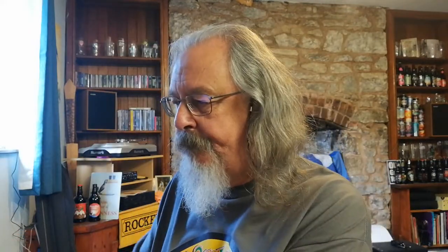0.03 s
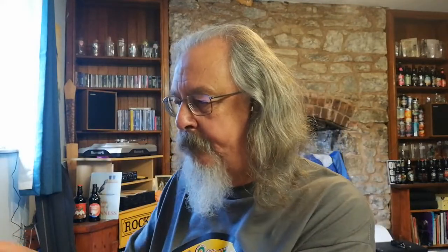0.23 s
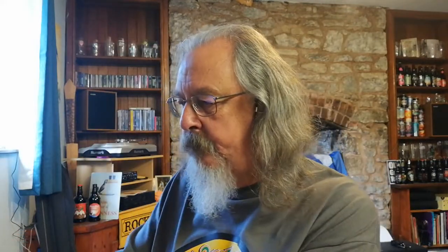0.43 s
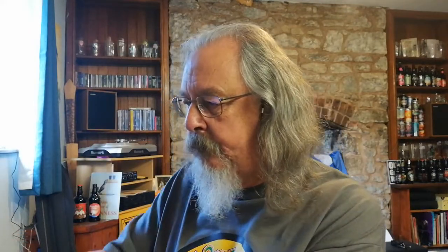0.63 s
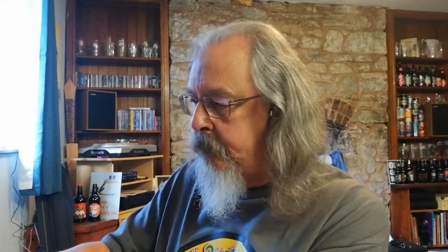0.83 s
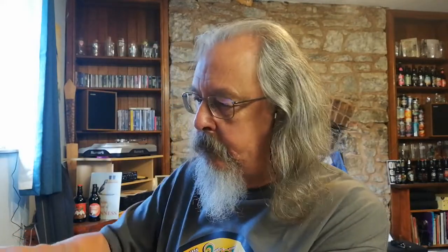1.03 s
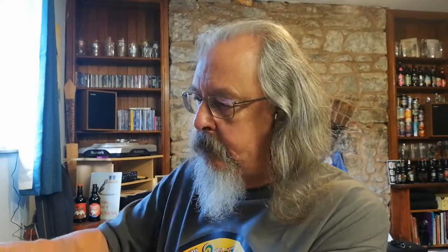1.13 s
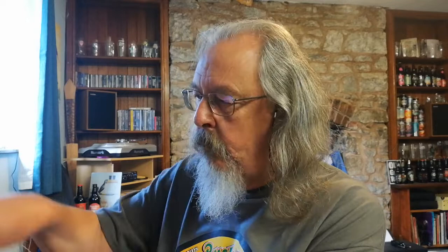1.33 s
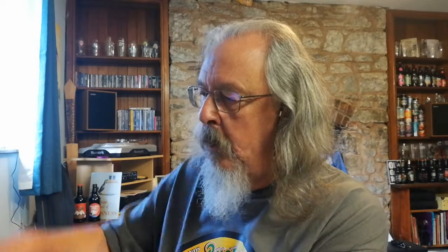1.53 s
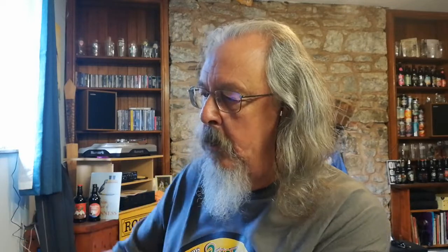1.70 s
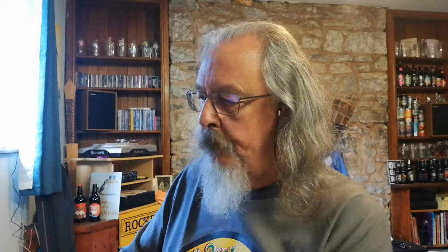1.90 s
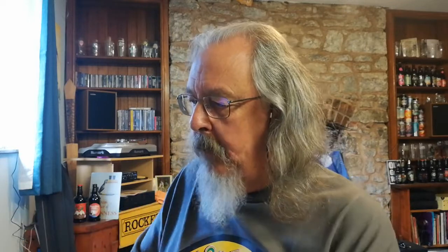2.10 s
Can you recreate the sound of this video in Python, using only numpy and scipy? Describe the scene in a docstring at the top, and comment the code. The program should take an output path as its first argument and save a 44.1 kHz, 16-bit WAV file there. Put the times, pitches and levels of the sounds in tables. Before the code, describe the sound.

A glass bottle is opened close by, slightly left, in a quiet room. Something slides softly over wood, then a metal opener clinks on the cap at 0.5 and 0.6 seconds. Gas hisses briefly just after 1 second. The cap snaps off at 1.3 seconds and rattles. Metal lands with a bright ring at 1.7 seconds, followed by dull bumps on a wooden table around 2 seconds.

```python
"""Something slides softly over a wooden table, then a steel opener clinks onto a beer bottle's crown cap.
Gas hisses through the gap as the cap lifts; the cap snaps off and rattles against the opener. The metal
lands with a bright, beating ring and things bump on the table, close by and a little left in a living room.
Rubs and hiss are shaped noise, knocks are short noise bursts; steel, glass and wood ring in fading modes."""
import sys
import numpy as np
from scipy import signal
from scipy.fft import rfft, irfft
from scipy.io import wavfile

SR = 44100
rng = np.random.default_rng(int(sys.argv[2]) if len(sys.argv) > 2 else 0)


def write(x):
    x = np.atleast_2d(x).T
    wavfile.write(sys.argv[1], SR, np.round(np.clip(x, -1, 1) * 32767).astype(np.int16))


N = 95167
TIME = np.arange(N) / SR

# Stereo image of the noises. Each row: frequency in Hz, left-right correlation.
STEREO_LIKENESS = [(110, 1), (300, 0.74), (600, 0.025), (12000, 0.26)]
# Tone colours of the noises. Each row: frequency in Hz, relative level in dB.
ROOM_TONE_COLOUR = [(50, 3), (110, -12), (500, -16), (1200, -13.5), (7000, -23.5), (10300, -21),
                    (16000, -36.5)]
RUB_COLOUR = [(300, -16.5), (1400, -5.5), (3000, -6.5), (3800, -1.5), (5000, -8.5), (8000, -8),
              (10300, 3.5), (11300, -4), (13000, -20), (16000, -22)]
WOOD_COLOUR = [(30, -5.5), (70, -5.5), (130, -1), (220, -15.5), (2000, -43)]
HISS_COLOUR = [(600, -41.5), (1800, -27), (4500, -15.5), (7500, -10.5), (9400, 2.5), (11500, -0.5),
               (16000, -15.5)]
# One fader curve for each rub across the table. Each point: time in seconds, level in dB.
RUB_FADES = [
    [(0, -45), (.13, -48), (.2, -43.5), (.29, -46.5), (.36, -55.5), (.45, -76)],
    [(1.88, -63), (2.0, -54.5), (2.16, -72)],
]
# The table rumbling under moving hands. Each row: time in seconds, level in dB.
RUMBLE_FADE = [(0, -62), (.21, -48), (.32, -51.5), (.39, -66), (.8, -69), (1.29, -66), (1.36, -45),
               (1.46, -44), (1.6, -48.5), (1.8, -86)]

# The frequencies in Hz at which the knocks are voiced.
KNOCK_BANDS_HZ = [110, 380, 1300, 3500, 10000]
# Knock cues. Each row: start in seconds, then a relative level in dB for each of those frequencies.
KNOCK_CUES = [(0.456, -36, -47.5, -39, -39, -25.5), (.602, -38, -49, -36.5, -26, -32),
              (0.675, -50, -60, -43, -46, -70), (1.3114, -31, -50, -30, -17, -22.5),
              (1.3145, -33, -27, -29.5, -16.5, -12), (1.3884, -51, -44.5, -41, -25, -26),
              (1.432, -38.5, -46.5, -38, -59, -10), (1.471, -53.5, -43, -40.5, -52, -25),
              (1.565, -60, -68, -44, -38.5, -35), (1.649, -44, -50.5, -35, -38.5, -63),
              (1.7277, -35.5, -25.5, -14.5, -21, -20.5), (1.842, -36, -27, -30, -75, -55),
              (1.858, -32, -24.5, -37, -28, -46), (1.944, -37.5, -38, -44, -61, -66),
              (1.989, -34.5, -21, -40, -74, -71), (1.999, -34, -16.5, -21.5, -56, -42.5),
              (2.008, -31, -19, -34, -48, -50), (2.032, -38, -34.5, -51, -53, -73),
              (2.054, -29.5, -35, -63.5, -61, -48)]
# A knock's dense clatter and its room tail. Each row: frequency in Hz, seconds to fade by 60 dB.
CLATTER_T60 = [(110, 0.11), (1000, 0.025), (10000, 0.02)]
TAIL_T60 = [(110, 0.36), (1000, 0.24), (4000, 0.29), (14000, 0.14)]
# Where the knocks sit. Each row: frequency in Hz, left over right in dB.
KNOCK_BALANCE = [(200, -0.5), (600, 3), (4000, 1.5), (10000, -2.5)]
# Slaps off nearby surfaces. Each row: delay in seconds, level in dB.
REFLECTIONS = [(.0036, -14), (.0073, -11.5)]

# The modes of each ringing body. Each row: pitch in Hz, relative level in dB, seconds to fade by 60 dB.
TABLE_MODES = [(71, 1.5, 0.25), (132.1, 3.5, 0.22), (282.3, -7.5, 0.21)]
OPENER_MODES = [(1400, -3, 0.28), (1752, -8, 0.08), (3965, -12, 0.25), (7190, -5, .05), (7520, -5, 0.075),
                (12200, -8, 0.035), (13600, -7, 0.035)]
NECK_MODES = [(1380, -9.5, 0.13), (2520, -1.5, 0.051), (4620, -4.5, 0.055), (4980, -16, 0.033),
              (6760, -9, 0.055), (8970, -1.5, 0.054)]
CAP_MODES = [(780, -18, 0.2), (4520, 1, 0.04), (7990, -4, 0.05), (9370, -6, 0.06), (12800, -4, 0.08),
             (14300, -9, .1)]
# The hits on each body. Each row: start in seconds, strength in dB, favoured frequency in Hz,
# dB lost per octave away from it (a negative loss is a boost).
TABLE_HITS = [(0.12, -36.5, 94, 7.2), (0.456, -33, 140, 14), (1.312, -25.5, 115, 3.6),
              (1.844, -24.5, 195, 12.3), (1.999, -17.5, 282, 23)]
OPENER_HITS = [(.455, -25.5, 2500, -3), (.602, -33.5, 1400, 17), (1.469, -18.5, 4940, 18)]
NECK_HITS = [(.602, -31, 4970, 0.73), (1.312, -15.5, 5950, 3.2)]
CAP_HITS = [(1.3895, -14, 7840, 26), (1.431, -18.5, 4900, 1.7)]
# Damped contacts, one short ping each. Each row: start in seconds, pitch in Hz, level in dB.
PING_CUES = [(.602, 4300, -16), (.602, 9216, -18), (1.389, 4020, -24), (1.567, 3050, -23),
             (1.566, 10960, -28.5), (1.648, 1520, -25), (1.7278, 3201, -8.5)]
# The landing metal's partials. Each row: pitch in Hz, left and right gain in dB, seconds to fade by 60 dB.
LANDING_PARTIALS = [(4002, 8, -15, .14), (3978, -1.5, -2.5, .19), (4028, -3.5, -7, .13),
                    (7990, -6, -7, .14), (7962, -14, -13, .16), (11985, -22, -23, .07)]


def from_db(db):
    """Decibels to gain."""
    return 10 ** (np.asarray(db) / 20)


def at_hz(points, hz):
    """Read a table on a log-frequency axis."""
    freqs, values = np.transpose(points)
    return np.interp(np.log(hz), np.log(freqs), values)


def decay(start, t60):
    """An envelope that jumps to 1 and falls 60 dB every t60 seconds."""
    return (TIME >= start) * np.exp(-np.log(1000) * np.maximum(TIME - start, 0) / t60)


def fader(curve):
    """Ride the gain along a curve, silent outside it."""
    return from_db(np.interp(TIME, *np.transpose(curve), left=-150, right=-150))


def pan(db):
    """Two gains, the left louder by db."""
    return from_db([[db / 2], [-db / 2]])


def from_left(x, lag_s=0.0002333):
    """A sound on the left reaches the right ear slightly later."""
    return np.array([x[0], np.interp(TIME - lag_s, TIME, x[1])])


def widen(mid, side, hz):
    """Spread two noises into stereo: centred in the bass, wide in the treble."""
    alike = np.clip(at_hz(STEREO_LIKENESS, hz), -.99, .99)
    return (np.sqrt(1 + alike) * mid + np.sqrt(1 - alike) * side * np.array([[1], [-1]])) / np.sqrt(2)


def noise(colour):
    """Smooth stereo noise of a given colour, rms 1."""
    hz = np.maximum(np.arange(N // 2 + 1) * SR / N, 1)
    spectrum = widen(*rfft(rng.standard_normal((2, N))), hz)
    x = irfft(spectrum * from_db(at_hz(colour, hz)), N)
    return x / x.std()


def shimmer(width_hz):
    """Many close modes beat unevenly: a complex gain that wanders around size 1."""
    hz = np.arange(N // 2 + 1) * SR / N
    spectrum = rfft(rng.standard_normal((2, N))) / (1 + (hz / width_hz) ** 2) ** 2
    real, imaginary = irfft(spectrum, N)
    return (real + 1j * imaginary) / np.hypot(real.std(), imaginary.std())


def twinned(modes, detune=.0132, twin_db=-9):
    """Slightly uneven metal and glass split each mode in two, so the ring wavers."""
    return list(modes) + [(hz * (1 + detune), db + twin_db, t60) for hz, db, t60 in modes]


def struck(modes, hits, shimmer_width=.024, all_rough_hz=8000):
    """Each hit rings all of a body's modes: low ones are pure, high ones crowd together and turn rough."""
    out = np.zeros(N)
    starts, hit_db, favoured_hz, loss_db = np.transpose(hits)
    for hz, mode_db, t60 in modes:
        octaves_away = np.abs(np.log2(hz / favoured_hz))
        clicks = np.full(N, 1e-18)
        clicks[(starts * SR).astype(int)] = from_db(hit_db + mode_db - loss_db * octaves_away)
        pole = np.exp((2j * np.pi * hz - np.log(1000) / t60) / SR)
        ring = signal.lfilter([1], [1, -pole], clicks)
        rough = min(hz / all_rough_hz, 1) ** 2
        out += np.imag(ring * (np.sqrt(1 - rough ** 2) + rough * shimmer(shimmer_width * hz)))
    return out


def reverb(x, t60=0.21):
    """The room's short wash of reflections, different at each ear."""
    echoes = rng.standard_normal((2, N)) * decay(0.0015, t60)
    echoes /= np.sqrt(np.sum(echoes ** 2, axis=1, keepdims=True))
    return signal.fftconvolve(x, echoes, axes=1)[:, :N]


def near_echoes(x):
    """Close surfaces repeat each contact a few milliseconds later."""
    return x + sum(from_db(db) * np.pad(x, ((0, 0), (int(s * SR), 0)))[:, :N] for s, db in REFLECTIONS)


def room_tone(level_db=-55):
    """The quiet living room: a faint, steady bed of noise."""
    return from_db(level_db) * noise(ROOM_TONE_COLOUR)


def slide():
    """Soft rubs across the table, with a rumble from the wood."""
    rubs = sum(fader(curve) for curve in RUB_FADES) * noise(RUB_COLOUR)
    return rubs + fader(RUMBLE_FADE) * noise(WOOD_COLOUR)


def table_bumps():
    """Bumps wake the low modes of the wooden table."""
    return struck(TABLE_MODES, TABLE_HITS)


def knocks(snap_db=17, tail_db=-12.5, top_db_per_octave=-28, sub_db_per_octave=-14.5):
    """Each contact is a sharp snap, a burst of clatter and a room tail, layered band by band."""
    out, edges = 0, np.geomspace(40, 17000, 16)
    for low, high in zip(edges, edges[1:]):
        hz = np.sqrt(low * high)
        rolloff_db = top_db_per_octave * max(np.log2(hz / KNOCK_BANDS_HZ[-1]), 0)
        rolloff_db += sub_db_per_octave * max(np.log2(KNOCK_BANDS_HZ[0] / hz), 0)
        place = pan(at_hz(KNOCK_BALANCE, hz))[:, 0]
        hits = np.zeros((2, N))
        for start, *band_db in KNOCK_CUES:
            db = at_hz(list(zip(KNOCK_BANDS_HZ, band_db)), hz)
            hits[:, int(start * SR)] = from_db(db + rolloff_db) * place
        clatter = decay(0, at_hz(CLATTER_T60, hz))
        tail = from_db(tail_db) * decay(0, at_hz(TAIL_T60, hz))
        power = signal.fftconvolve(hits ** 2, (clatter ** 2 + tail ** 2)[None], axes=1)[:, :N]
        bursts = np.sqrt(np.abs(power)) * widen(*rng.standard_normal((2, N)), hz)
        bandpass = signal.butter(2, [low, high], "band", fs=SR, output="sos")
        band = signal.sosfilt(bandpass, bursts + hits * from_db(snap_db))
        out = out + band * np.sqrt(np.log2(high / low) * SR / 2 / (high - low))  # weigh octaves equally
    return out


def clinks(ping_t60=0.028, ping_width=0.094, ring_send_db=-2.5, ping_send_db=-7):
    """Opener, bottle neck and cap ring into the room; damped contacts give only a gritty ping."""
    rings = struck(twinned(OPENER_MODES), OPENER_HITS)
    rings += struck(twinned(NECK_MODES), NECK_HITS)
    rings += struck(twinned(CAP_MODES), CAP_HITS)
    pings = np.zeros(N)
    for start, hz, db in PING_CUES:
        gritty_tone = np.imag(np.exp(2j * np.pi * hz * TIME) * shimmer(ping_width * hz))
        pings += from_db(db) * decay(start, ping_t60) * gritty_tone
    place = pan(db=5)
    send = from_db(ring_send_db) * rings + from_db(ping_send_db) * pings
    return from_left((rings + pings) * place) + reverb(send * place)


def metal_landing(start=1.731, swell_s=0.021, send_db=-19):
    """The metal lands: a loud ring near 4 kHz and two overtones bloom, and close partials beat."""
    age = np.maximum(TIME - start, 0)
    ring = sum(from_db([[left_db], [right_db]]) * np.sin(2 * np.pi * hz * age) * decay(start, t60)
               for hz, left_db, right_db, t60 in LANDING_PARTIALS)
    ring *= 1 - np.exp(-age / swell_s)
    return from_left(ring) + from_db(send_db) * reverb(ring)


def gas_hiss(start=1.0403, spent_at=1.1512, attack_s=0.0052, swell_s=0.022):
    """Gas jets out abruptly, swells while the cap lifts and dies as the pressure is spent."""
    full_db, swell_db, fall_db_per_s = -12, 16.5, 313
    age = np.maximum(TIME - start, 0)
    attack = np.minimum(age / attack_s, 1) ** 2
    db = full_db - swell_db * np.exp(-age / swell_s) - fall_db_per_s * np.maximum(TIME - spent_at, 0)
    return attack * from_db(db) * from_left(noise(HISS_COLOUR))


def scene():
    """Contacts, hiss and rubs, mixed over the room tone."""
    contacts = from_left(near_echoes(knocks())) + clinks() + table_bumps() + metal_landing()
    return contacts + gas_hiss() + slide() + room_tone()


def record(dry, cutoff_hz=15900):
    """Clip the peaks at full scale, then cut the very top with a steep low-pass."""
    lowpass = signal.ellip(10, .2, 80, cutoff_hz, fs=SR, output="sos")
    return signal.sosfilt(lowpass, np.clip(dry, -1, 1))


dry = scene()
out = record(dry)
write(out)
```